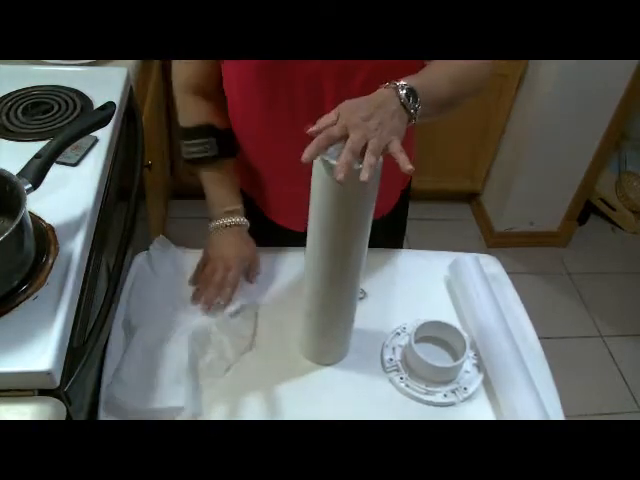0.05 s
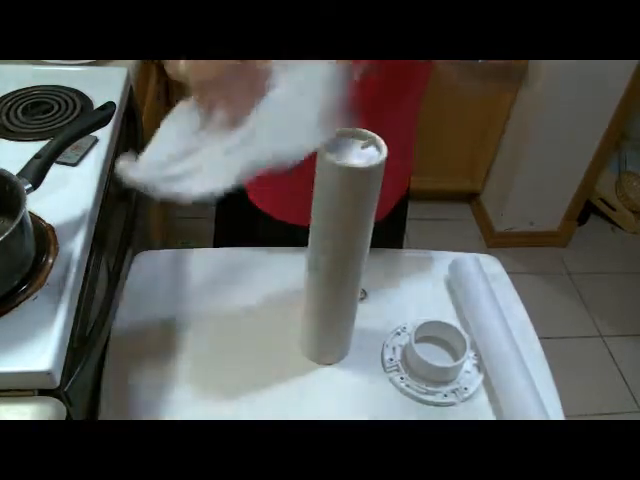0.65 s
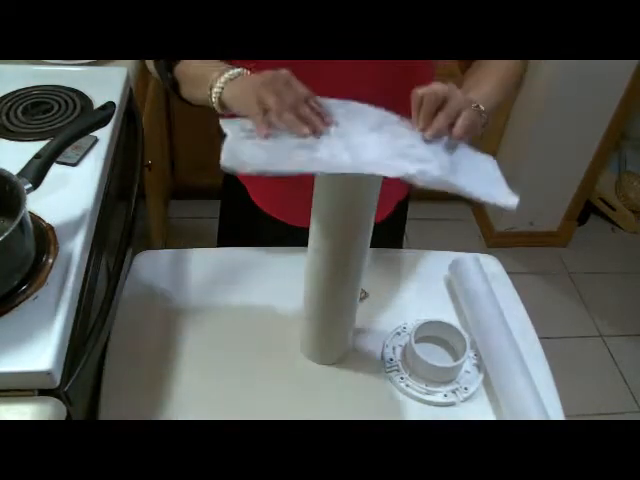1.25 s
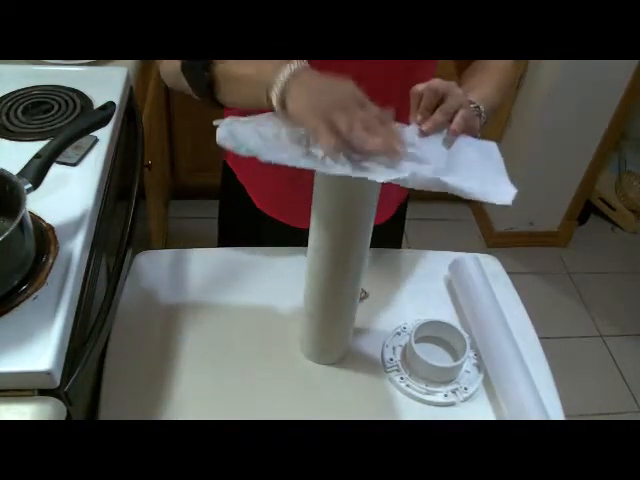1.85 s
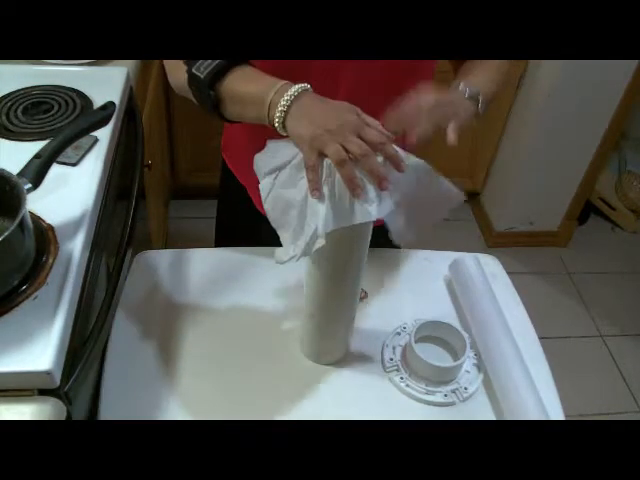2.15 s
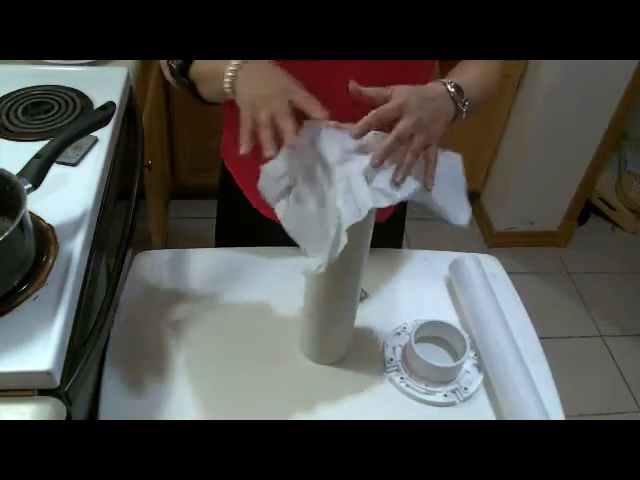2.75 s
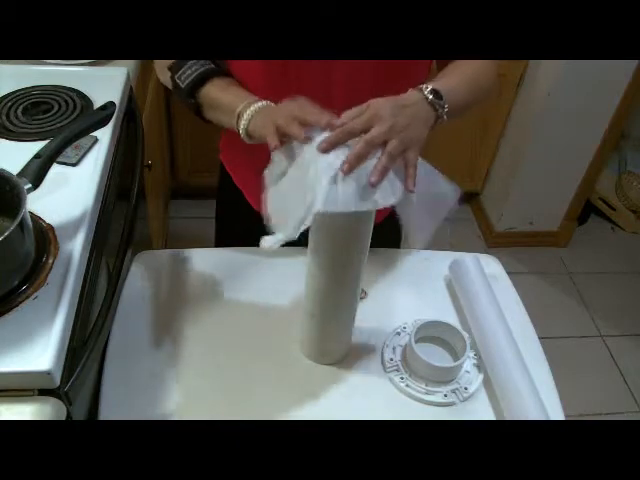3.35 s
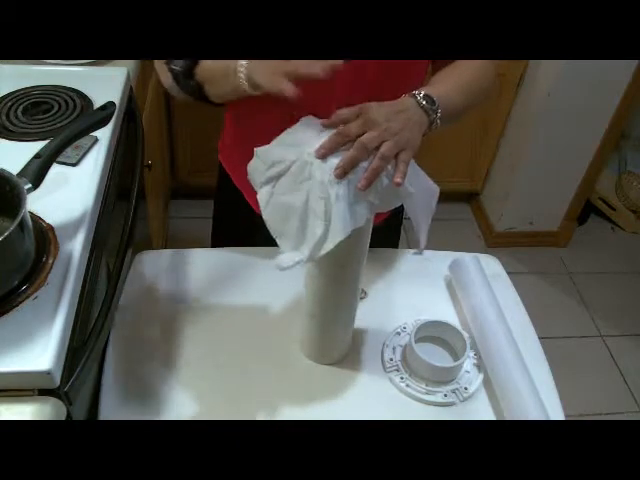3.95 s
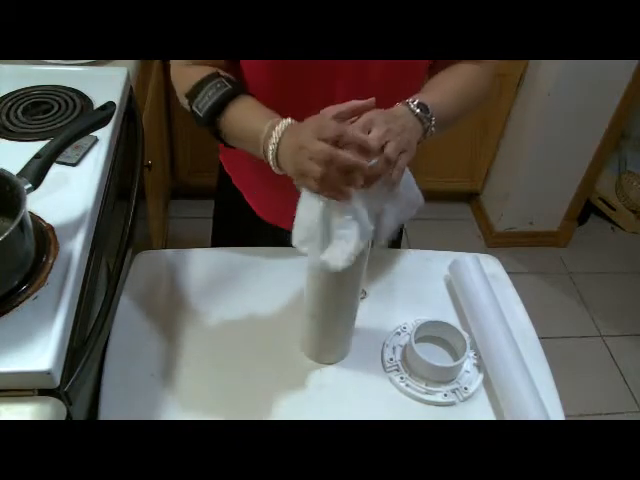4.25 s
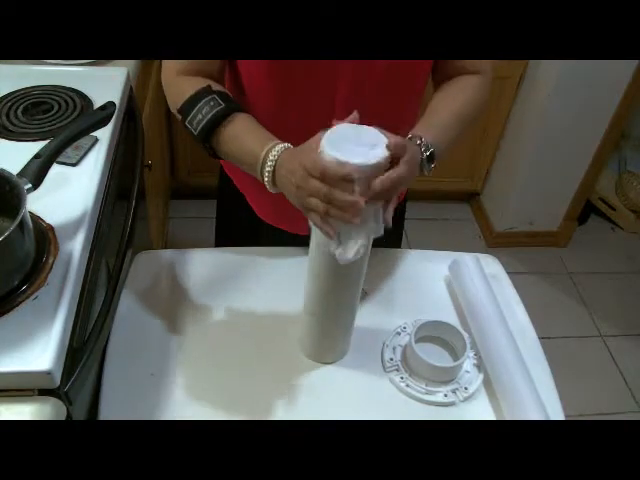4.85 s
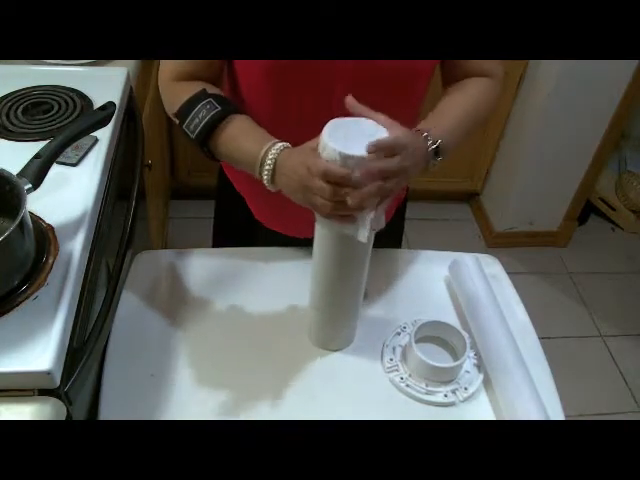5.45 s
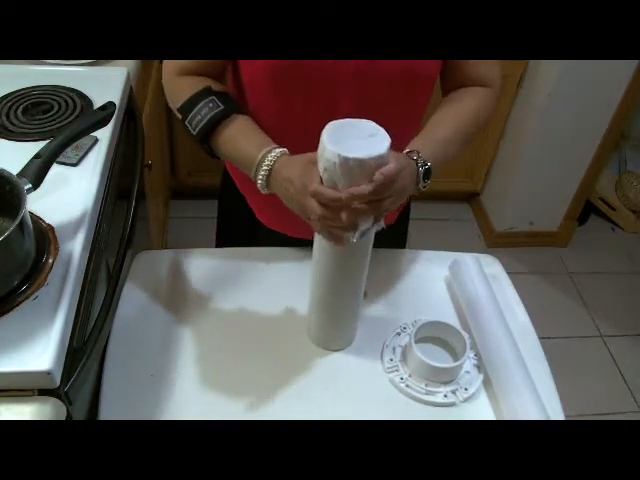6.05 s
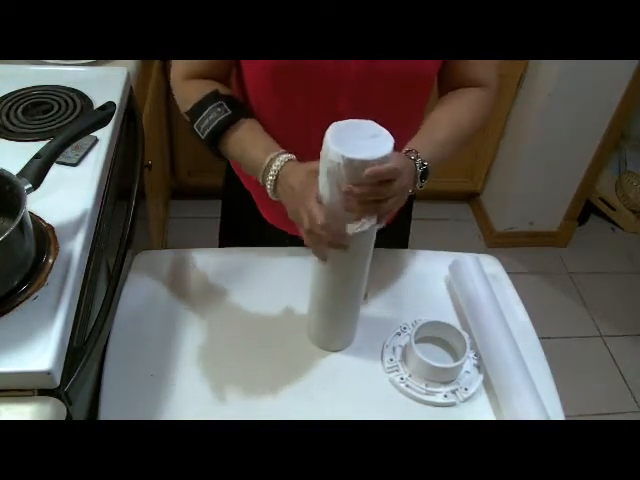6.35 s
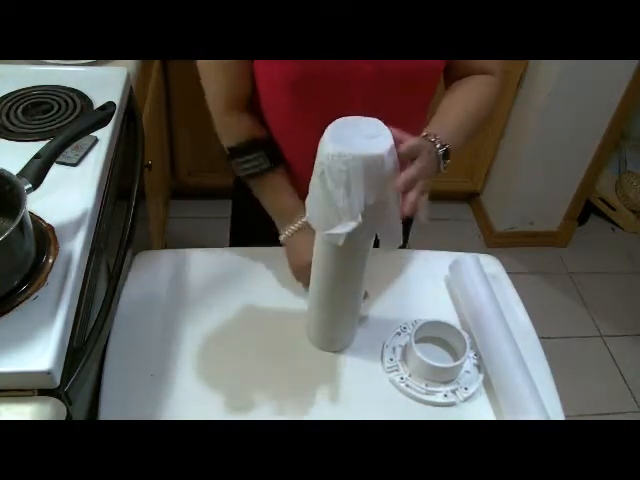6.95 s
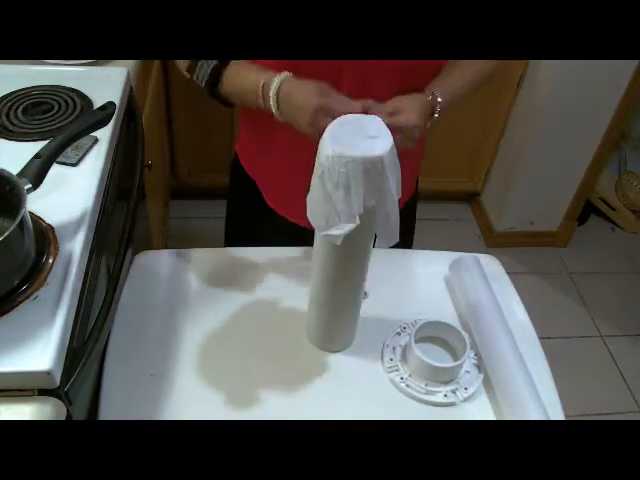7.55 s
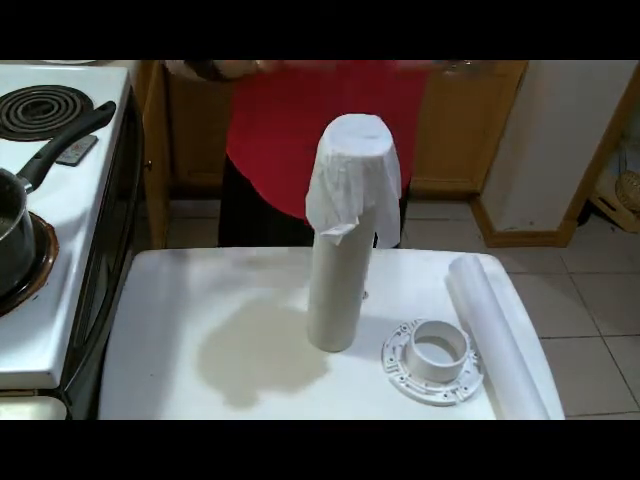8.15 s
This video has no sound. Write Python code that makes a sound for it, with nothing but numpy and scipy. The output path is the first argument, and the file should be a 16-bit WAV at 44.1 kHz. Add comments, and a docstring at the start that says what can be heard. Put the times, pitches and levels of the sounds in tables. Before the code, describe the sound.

Close, crisp rustling of baking paper being lifted, patted and squeezed around the end of an upright pipe in a quietly humming kitchen.

```python
"""A small, hard kitchen hums steadily, heard by a close stereo microphone. A sheet of baking paper is
lifted off a plastic table: its creases buckle in showers of tiny clicks, slack panels pop with a pitch
and whole folds snap over, while hands bump the table and an upright pipe into resonance. From 1 s the
sheet is laid over the end of the pipe, pressed and patted; from about 4 s it is gathered, folded down
and squeezed. Near 7 s the hands let go, and the last few snaps fade into the hum."""
import sys
import numpy as np
from scipy import signal
from scipy.fft import rfft, irfft, next_fast_len
from scipy.io import wavfile
from scipy.ndimage import uniform_filter1d

SR = 44100
rng = np.random.default_rng(int(sys.argv[2]) if len(sys.argv) > 2 else 0)


def output_pcm(signal):
    """Save a mono or channel-first signal as 16-bit PCM at the path in sys.argv[1].

    Samples are clipped to [-1, 1] before scaling.
    """
    pcm = np.clip(np.atleast_2d(signal).T, -1, 1) * 32767
    wavfile.write(sys.argv[1], SR, np.round(pcm).astype(np.int16))


N = 361619
T = np.arange(N) / SR
PAD = next_fast_len(N + SR, True)
FREQ = np.maximum(np.fft.rfftfreq(PAD, 1 / SR), 1)

# stereo width at the microphone: (frequency [Hz], relative gain of the side signal [dB])
STEREO_WIDTH = [(60, -4), (110, -6), (200, -11), (370, -11), (670, -14), (1230, -12), (2260, -4.5),
                (4140, -2), (7580, 0.5), (13900, 0)]


def undb(db):
    """Decibels to amplitude ratio."""
    return 10 ** (np.asarray(db) / 20)


def unit(x):
    """Normalisation to an rms of 1."""
    return x / np.sqrt(np.mean(x ** 2))


def curve(points):
    """Interpolation of (frequency [Hz], gain [dB]) points on a log-frequency axis."""
    hz, db = np.transpose(points)
    return np.interp(np.log(FREQ), np.log(hz), db)


def colour(x, db):
    """Minimum-phase filtering: folding the cepstrum makes the gain curve causal."""
    cepstrum = irfft(np.log(undb(db)), PAD)
    cepstrum[1:PAD // 2] *= 2
    cepstrum[PAD // 2 + 1:] = 0
    return irfft(rfft(x, PAD) * np.exp(rfft(cepstrum)), PAD)[..., :N]


def band(x, hz, kind, order=2):
    """Maximally flat low-pass or high-pass filtering."""
    return signal.sosfilt(signal.butter(order, hz, kind, fs=SR, output="sos"), x)


def ring(x, modes):
    """Superposition of driven resonances: (frequency [Hz], bandwidth [Hz], gain [dB])."""
    return sum(undb(db) * signal.lfilter(*signal.iirpeak(hz, hz / width, fs=SR), x)
               for hz, width, db in modes)


def steady(x, span_s):
    """Division by the running rms holds the level near 1 and keeps the grain."""
    size = int(span_s * SR)
    power = uniform_filter1d(uniform_filter1d(x ** 2, size), size)
    return x / np.sqrt(power + 1e-4)


def wander(rate_hz):
    """Smooth random modulation with a spread near 1."""
    size = int(SR / rate_hz)
    held = np.repeat(rng.standard_normal(N // size + 2), size)[rng.integers(size):]
    return 1.25 * uniform_filter1d(held, size)[:N]


def kitchen_hum():
    """Stationary noise: broadband from the air, narrowband from an appliance."""
    # air noise: (frequency [Hz], relative level [dB])
    air_spectrum = [(18, -36), (30, -14), (77, -14), (103, -16.5), (146, -12.5), (321, -6), (477, -5),
                    (527, -5.5), (726, -6), (885, -7), (953, -4.5), (1030, -5), (1680, -14.5), (9250, -23),
                    (11000, -34), (14300, -113), (22000, -120)]
    # appliance drone: (frequency [Hz], bandwidth [Hz], level [dB])
    drone_bands = [(58.7, 3.5, -95), (473.6, 19, -77), (950, 27, -89)]
    mid, side = (unit(colour(rng.standard_normal(N), curve(air_spectrum))) for _ in range(2))
    side = colour(side, curve(STEREO_WIDTH))
    drone = sum(undb(db) * unit(ring(rng.standard_normal(N), [(hz, width, 0)]))
                for hz, width, db in drone_bands)
    return undb(-67.5) * np.array([mid + side, mid - side]) + drone


def handling():
    """Incoherent sources add in power: returns total effort and power-weighted body and crispness [dB]."""
    # light rustle between strokes: (time [s], effort [dB])
    touch = [(0, -88), (0.75, -69), (0.92, -50), (1.7, -60.5), (1.9, -83), (2.1, -56), (2.5, -71),
             (2.7, -60.5), (3.2, -59), (3.7, -50.5), (4.18, -55.5), (4.4, -49.5), (7.15, -54),
             (7.35, -67.5), (8.2, -75.5)]
    # strokes of the hands on the sheet:
    # (start [s], attack [s], hold [s], release [s], effort [dB], body [dB], crispness [dB])
    strokes = [(0.188, 0.055, 0.24, .3, -39.5, 3.5, 0), (0.98, 0.064, 0.038, 0.34, -40.5, 1.5, 1),
               (1.401, 0.016, 0.09, 0.32, -40, 2.5, -1), (2.082, 0.041, 0.015, .14, -38, 2, 1),
               (2.161, 0.089, 0.071, 0.11, -38, 0.5, -0.5), (2.545, 0.12, 0.0094, 0.088, -48, 0, -1),
               (2.875, 0.038, 0.054, .06, -57, 10, -9), (3.222, 0.11, 0.018, 0.11, -45.5, 5.5, -4),
               (3.495, 0.043, 0.03, 0.058, -34.5, 2.5, -1), (3.575, 0.056, 0.033, 0.11, -47.5, 7.5, -5),
               (3.854, 0.021, 0.0089, 0.12, -38.5, 2, 3), (4.285, 0.066, 0.067, 0.12, -35, 0.5, -1),
               (4.414, 0.054, 0.027, 0.33, -33.5, 1.5, 0.5), (4.584, 0.038, 0.02, 0.14, -39.5, -2, 0),
               (4.718, 0.051, 0.16, .1, -42, 1.5, 1.5), (4.862, 0.099, 0.093, 0.16, -33, -3.5, 1),
               (5.081, 0.057, 0.072, 0.26, -32.5, -5, 0), (5.376, 0.042, 0.27, 0.24, -41, -3, 2),
               (5.755, 0.07, .08, 0.077, -39.5, -4.5, 1), (5.9, 0.059, 0.064, 0.18, -34, -8, 1),
               (6.132, 0.1, 0.028, 0.12, -39, -5, 5), (6.315, 0.031, 0.061, 0.093, -42.5, -21, 4),
               (6.43, 0.032, 0.14, 0.22, -41, -5.5, 4.5), (6.692, 0.047, 0.12, 0.36, -45.5, -7, 0),
               (7.506, 0.054, 0.035, .08, -58, 6.5, -6)]
    touch_body_db, touch_crisp_db = 2.5, -6.5  # a light touch bends the sheet rather than creasing it
    power = undb(np.interp(T, *np.transpose(touch))) ** 2
    body, crisp = power * touch_body_db, power * touch_crisp_db
    for start, attack, hold, release, db, body_db, crisp_db in strokes:
        rise = np.clip((T - start) / attack, 0, 1) ** 1.04
        fall = np.clip(1 - (T - start - attack - hold) / release, 0, 1) ** 1.63
        stroke_power = (undb(db) * rise * fall) ** 2
        power += stroke_power
        body += stroke_power * body_db
        crisp += stroke_power * crisp_db
    return 10 * np.log10(power), body / power, crisp / power


def clicks(per_second, scatter_db):
    """Shot noise: independent impulses, most of them tiny, a few large."""
    occurs = rng.random(N) < per_second / SR
    size = np.minimum(rng.exponential(size=N), 3.3)
    sign = rng.choice([-1, 1], N)
    return occurs * sign * undb(scatter_db * size)


def facets(x, scatter_db, drift_db):
    """Impulse excitation: each click rings facets of many sizes, in a mix that drifts as the sheet folds."""
    ringing, hits = 0, np.flatnonzero(x)
    for hz in np.geomspace(900, 12500, 20):
        scatter = np.clip(rng.standard_normal(N)[hits], -2, 2)
        drift = wander(rate_hz=16)[hits]
        push = np.zeros(N)
        push[hits] = x[hits] * undb(scatter_db * scatter + drift_db * drift)
        ringing += signal.lfilter(*signal.iirpeak(hz, Q=8, fs=SR), push)
    return ringing + undb(0.5) * x  # plus the bare crack of the crease


def bend_tone(x, body_db, crisp_db, body_hz=1250, crisp_hz=6300):
    """Size sets the spectrum: wide bends radiate the body, tight creases the crisp treble."""
    spectrum = rfft(x, PAD)
    low = irfft(spectrum / (1 + (FREQ / body_hz) ** 6), PAD)[:N]
    high = irfft(spectrum / (1 + (crisp_hz / FREQ) ** 6), PAD)[:N]
    return x + (undb(body_db) - 1) * low + (undb(crisp_db) - 1) * high


def crinkle(effort_db, body_db, crisp_db):
    """Buckling and friction: more effort buckles more creases a second; the sheet slides on itself."""
    per_second = 900 * undb(.55 * (effort_db + 39.5))
    buckles = clicks(per_second, scatter_db=3.5)
    creases = steady(facets(buckles, scatter_db=6, drift_db=2), span_s=0.036)
    sliding = undb(-10) * rng.standard_normal(N)
    moving = 1 / (1 + undb(2 * (-67.5 - effort_db)))  # a sheet at rest is silent
    return bend_tone((creases + sliding) * undb(effort_db) * moving, body_db, crisp_db)


def paper(spots=10, dwell_samples=96):
    """Distributed source: buckles leap between spots, each with its own echoes, and ring the hollow pipe."""
    # air in the pipe under the paper: (frequency [Hz], bandwidth [Hz], gain [dB])
    pipe_modes = [(230, 44, 3.5), (420, 12, -3.5), (675, 112, -3), (1760, 64, -26)]
    # radiation of the sheet: (frequency [Hz], relative gain [dB])
    sheet_spectrum = [(71, -78), (120, -30), (190, -30), (250, -16.5), (330, -12.5), (480, -8.5), (660, -6),
                      (1050, -5), (1600, 0), (2800, 0.5), (4800, -0.5), (8000, -4), (12500, -9),
                      (14000, -19)]
    effort_db, body_db, crisp_db = handling()
    sheet = crinkle(effort_db, body_db, crisp_db) + fold_snaps(body_db)
    active_spot = np.repeat(rng.integers(spots, size=N // dwell_samples + 1), dwell_samples)[:N]
    heard = 0
    for spot in range(spots):
        share = uniform_filter1d(1. * (active_spot == spot), size=16)
        heard += room(sheet * share, direct_db=-6, echo_db=-0.46)
    return colour(heard + ring(heard, pipe_modes), curve(sheet_spectrum) + 2.52)


def panel_pops(decay_s=0.028):
    """Damped vibration: a slack panel flips over and flutters briefly around its own note."""
    # panels of the sheet flipping: (time [s], frequency [Hz], level [dB])
    flips = [(0.19, 2330, -51), (0.356, 2520, -32.5), (1.961, 2400, -57.5), (1.964, 3120, -58),
             (2.742, 3030, -47), (3.041, 3200, -51.5), (3.482, 1660, -46), (3.89, 1960, -37.5),
             (4.013, 2020, -44), (4.2, 1390, -54), (4.261, 2200, -45), (4.43, 1710, -34),
             (4.635, 2170, -38.5), (4.79, 2690, -35.5), (5.41, 1750, -42), (5.961, 1900, -37),
             (7.572, 1680, -51)]
    out, t = np.zeros(N + SR), T[:SR // 4]
    for start, hz, db in flips:
        noise = rng.standard_normal(len(t))
        flutter = unit(ring(ring(noise, [(hz, 0.34 * hz, 0)]), [(hz, 0.35 * hz, 0)]))
        i = int(start * SR)
        out[i:i + len(t)] += undb(db) * steady(flutter, span_s=0.014) * np.exp(-t / decay_s)
    return out[:N]


def hand_bumps():
    """Forced vibration: soft, scuffing pushes drive the modes of the pipe and table."""
    # hand contacts: (time [s], relative level [dB], centre frequency [Hz], decay time [s])
    contacts = [(0.223, -42, 950, 0.059), (0.225, -47, 380, 0.065), (1.406, -61.5, 417, 0.058),
                (3.534, -51.5, 850, 0.041), (4.587, -57, 700, 0.03), (4.942, -52.5, 786, 0.077),
                (5.178, -56, 700, 0.023), (5.236, -58, 276, 0.029), (5.649, -57, 447, 0.082),
                (5.668, -47, 278, 0.02), (6.578, -59, 490, 0.0074), (7.165, -58.5, 330, 0.036),
                (7.208, -63, 320, 0.075)]
    # pipe standing on the table: (frequency [Hz], bandwidth [Hz], gain [dB])
    table_modes = [(227.4, 16, 0.5), (303, 19, -6), (353, 8.6, -1.5), (433, 27, -0.5), (533, 49, -10),
                   (657, 61, 4.5), (715, 63, 3), (800, 210, -12.5), (1080, 100, -1), (1300, 100, -7)]
    force, t = np.zeros(N), T[:SR // 3]
    for start, db, hz, decay_s in contacts:
        scuff = rng.standard_normal(len(t)) * np.exp(-t / decay_s)
        scuff[0] += .6 * np.sqrt(np.sum(scuff ** 2))  # first contact
        push = ring(ring(scuff, [(hz, hz, 0)]), [(hz, hz, 0)])
        push *= np.sqrt(decay_s * SR / 2 / np.sum(push ** 2))  # energy grows with duration
        i = int(start * SR)
        force[i:i + len(t)] += undb(db + 5) * push
    return band(ring(force, table_modes), 173, "high", order=3)


def fold_snaps(body_db, decay_s=0.018):
    """Snap-through instability: a fold gives way with one crack, then a dying run of smaller buckles."""
    # folds snapping over: (time [s], relative level [dB], crispness [dB])
    folds = [(0.224, -29.5, 3.5), (0.268, -28.5, 1), (0.305, -30, 2), (0.356, -30.5, -1), (0.42, -27, -8),
             (0.4758, -31, 6.5), (0.8294, -51, 3), (0.9272, -38.5, 1), (1.0205, -32.5, 0.5),
             (1.2012, -45, -2), (1.2455, -27.5, 0.5), (1.403, -31.5, -19), (1.643, -33.5, 3.5),
             (1.7228, -33, 2.5), (1.958, -49.5, -5), (2.106, -33, 1), (2.232, -29, 2.5),
             (2.313, -27.5, 0.5), (2.565, -41.5, -10), (2.7402, -36.5, -3.5), (3.04, -45.5, -3),
             (3.231, -48, 3), (3.2845, -39.5, 6), (3.339, -37.5, 10), (3.54, -27, 3), (3.772, -33, 0.5),
             (3.866, -29, -11), (3.894, -46, 2), (4.0153, -40.5, 4.5), (4.118, -44, 5.5), (4.207, -42, 6),
             (4.335, -29.5, 0), (4.74, -28.5, 2), (4.866, -30, -15), (5.049, -33, -6), (5.1636, -26.5, -4),
             (5.242, -29, 5), (5.411, -28.5, -15), (5.514, -40.5, 12), (5.645, -26.5, 3),
             (6.2184, -35.5, 8), (6.4574, -32, 6.5), (6.5756, -32.5, 4.5), (6.648, -34, 7),
             (6.754, -35.5, 0), (6.969, -46, 10), (7.017, -43.5, 6.5), (7.203, -46, -5), (7.3425, -50, -2),
             (7.403, -54, -13), (7.48, -42, -8), (7.531, -45, 2), (7.5722, -51.5, -12),
             (7.9104, -54.5, -2.5), (8.021, -51.5, -27)]
    crack_db, run_db = 8, -4.5
    buckles = clicks(per_second=2200, scatter_db=5.5)
    run = steady(facets(buckles, scatter_db=5, drift_db=5.5), span_s=0.0043)
    out, crisp = np.zeros((2, N))
    dying = np.exp(-T / decay_s)
    for start, db, crisp_db in folds:
        i = int(start * SR)
        out[i:] += undb(db + run_db) * run[i:] * dying[:N - i]
        out[i] += undb(db + crack_db)
        crisp[i:] = crisp_db
    return bend_tone(out, body_db - 3, crisp)  # a little thinner than the sheet as it is held


def reflections(t60_low_s=0.22, t60_mid_s=0.51, t60_top_s=0.21, early_decay_s=0.011):
    """Diffuse reverberation: early reflections off table and body, then a tail decaying in three bands."""
    t = T[:SR // 2]
    noise = rng.standard_normal(len(t)) * (t > .0012)
    low, top = band(noise, 1100, "low", order=1), band(noise, 6100, "high", order=1)
    bands = [(low, t60_low_s), (noise - low - top, t60_mid_s), (top, t60_top_s)]
    tail = sum(part * undb(-60 * t / t60) for part, t60 in bands)
    early = undb(5.5) * noise * np.exp(-t / early_decay_s)
    response = early + tail
    return response / np.sqrt(np.sum(response ** 2))


def room(x, direct_db, echo_db):
    """Direct and diffuse fields as mid and side: the source is ahead, its reflections all round."""
    mid, side = (signal.oaconvolve(x, reflections())[:N] for _ in range(2))
    return np.array([undb(direct_db) * x + undb(echo_db) * mid, undb(echo_db) * side])


def microphone(mid, side):
    """Spatial coherence: two close ports hear long waves much alike, short waves differently."""
    # imbalance of the ports: (frequency [Hz], left minus right [dB])
    balance = [(60, 10), (110, -14), (200, -0.5), (370, -3), (670, -1.5), (1230, -2), (2260, -1.5),
               (4140, -0.5), (7580, 2), (13900, 2)]
    side = colour(side, curve(STEREO_WIDTH) + 0.24)
    lean_db = curve(balance) / 2
    return np.array([colour(mid + side, lean_db), colour(mid - side, -lean_db)])


def scene():
    """Superposition of paper, pops and bumps at the microphone, over the kitchen's hum."""
    pops = room(panel_pops(), direct_db=-5.5, echo_db=-4)
    bumps = room(hand_bumps(), direct_db=0.5, echo_db=-3)
    mid, side = paper() + pops + bumps
    return microphone(mid, side) + kitchen_hum()


def record(dry, cutoff_hz=13950):
    """Band limiting: a steep elliptic low-pass removes the highest treble."""
    return signal.sosfilt(signal.ellip(10, .2, 70, cutoff_hz, fs=SR, output="sos"), dry)


dry = scene()
out = record(dry)
output_pcm(out)
```